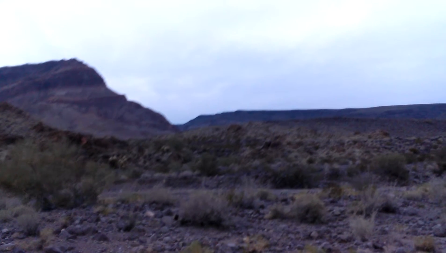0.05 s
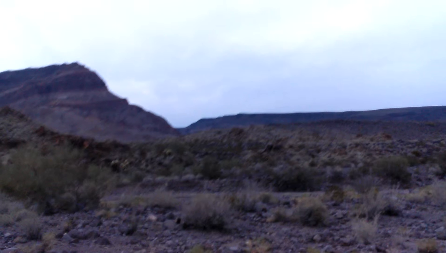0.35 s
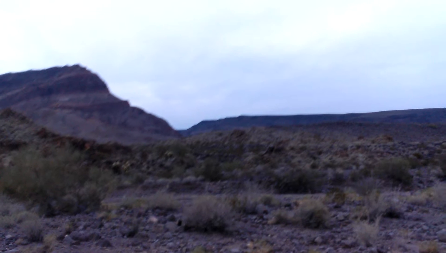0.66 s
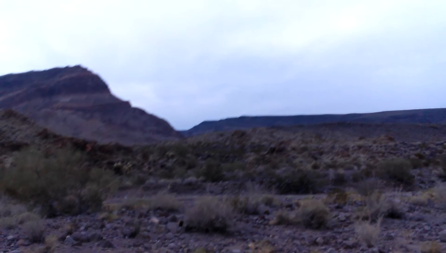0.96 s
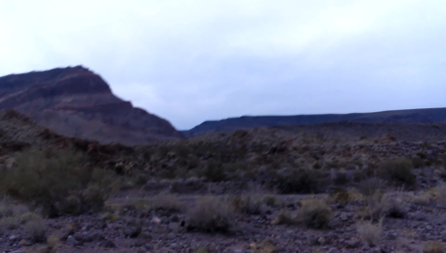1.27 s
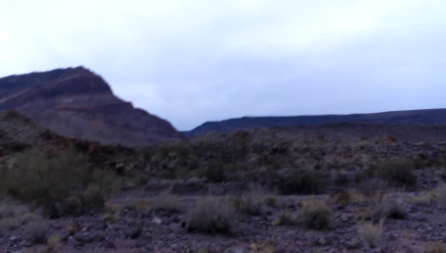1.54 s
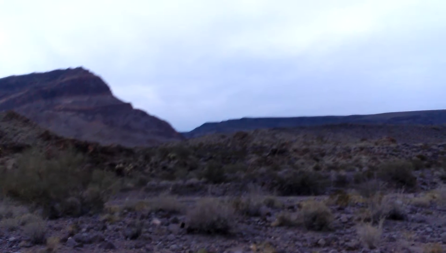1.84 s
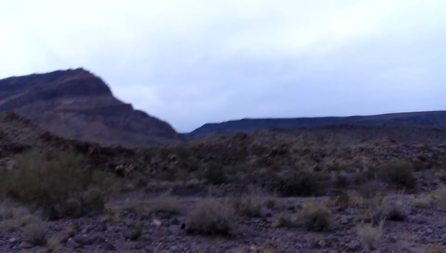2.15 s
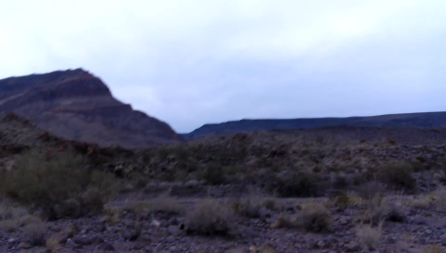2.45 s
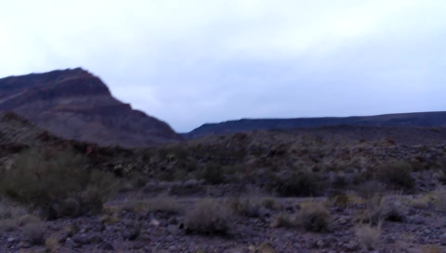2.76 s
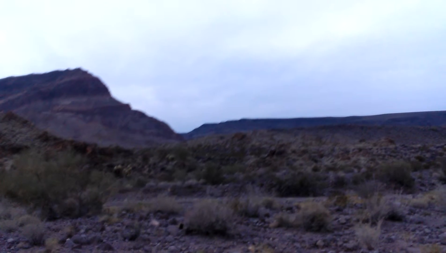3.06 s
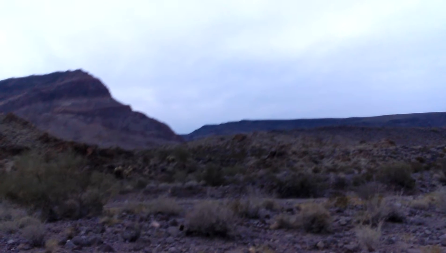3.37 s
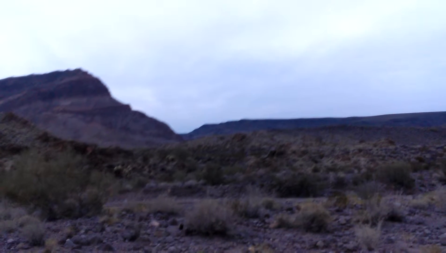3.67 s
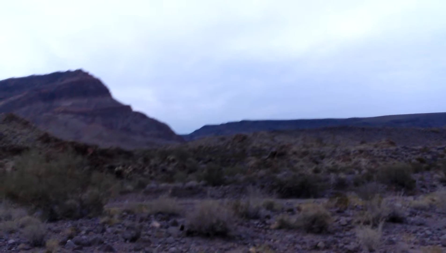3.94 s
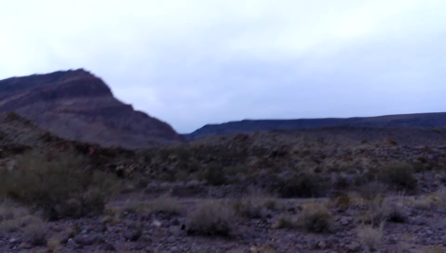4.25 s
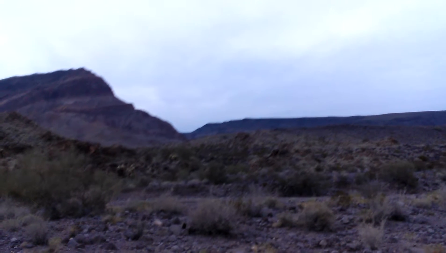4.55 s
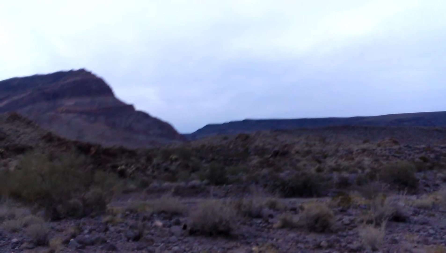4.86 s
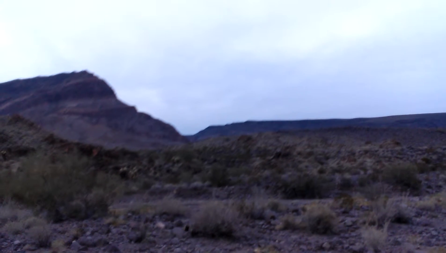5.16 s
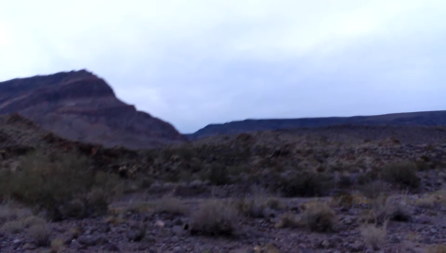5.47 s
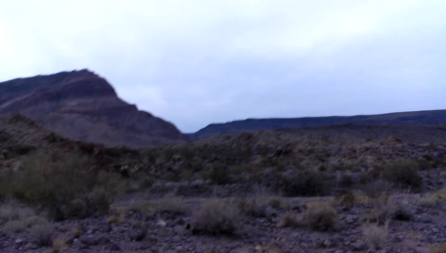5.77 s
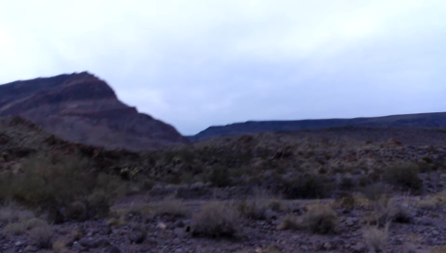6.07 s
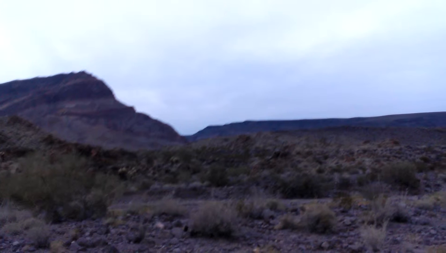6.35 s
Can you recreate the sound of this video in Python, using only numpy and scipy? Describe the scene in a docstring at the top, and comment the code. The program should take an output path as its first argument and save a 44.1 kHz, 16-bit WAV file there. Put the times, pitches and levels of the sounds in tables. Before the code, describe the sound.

A coyote opens with a high howl that cracks and drops away, followed by one short arched yelp. Light wind rumbles and puffs on the microphone. Then other coyotes answer faintly from far off, and more yelps come, ending in a quick run, each with a short echo from a slope. A soft hiss swells and sinks with the gusts and calls in the open desert.

```python
"""A coyote opens with a high howl that cracks and drops, over light wind that rumbles on the microphone.
Brush scatters the call and the slopes return a faint long tail. An arched yelp follows, then wind puffs.
From about 2.5 s others answer from far off, and more yelps come, each with a short echo from a slope.
Throughout, a noise suppressor turns quiet moments down, so the hiss swells and sinks with gusts and calls.
"""
import sys
import numpy as np
from scipy import signal
from scipy.fft import rfft, irfft, next_fast_len
from scipy.io import wavfile

SR = 44100
rng = np.random.default_rng(int(sys.argv[2]) if len(sys.argv) > 2 else 0)


def to_wav(s):
    """Save 16-bit WAV."""
    ch = np.atleast_2d(s).T  # columns
    pcm = np.round(np.clip(ch, -1, 1) * 32767)  # PCM
    wavfile.write(sys.argv[1], SR, pcm.astype(np.int16))


N = 291501
TIME = np.arange(N) / SR
FALL_S = .031  # the closing fall of a howl or yelp

# Spectrum of the hiss. Each row: frequency in Hz, relative density in dB.
HISS_SPECTRUM = [(200, -0.5), (480, 11.5), (700, 15.5), (1000, 8.5), (1500, 4), (2000, 3.5), (3000, .5),
                 (4500, -3.5), (6500, -4.5), (8300, -4), (12500, -7), (15500, -11)]


def from_db(db):
    """Amplitude grows tenfold with every 20 dB."""
    return 10 ** (np.asarray(db) / 20)


def rms_one(x):
    """Division by the root mean square gives unit power."""
    return x / np.sqrt(np.mean(x ** 2) + 1e-20)


def in_time(rows):
    """Linear interpolation gives each column of a curve at every sample."""
    seconds, *columns = np.transpose(rows)
    return [np.interp(TIME, seconds, column) for column in columns]


def drift(rate, size=N):
    """Low-passed noise wanders with unit spread, about rate times a second."""
    pole = np.exp(-80 * np.pi * rate / SR)
    slow = signal.lfilter([1], [1, -2 * pole, pole * pole], rng.standard_normal(size // 40 + 2002))
    slow = rms_one(slow[2000:])
    return np.interp(np.arange(size) / 40, np.arange(len(slow)), slow)


def coloured_noise(spectrum):
    """Spectral weighting colours white noise; the result has unit power."""
    hz, db = np.transpose(spectrum)
    size = next_fast_len(N)
    bins_hz = np.fft.rfftfreq(size, 1 / SR) + 1
    gain = from_db(np.interp(np.log(bins_hz), np.log(hz), db))
    return rms_one(irfft(rfft(rng.standard_normal(size)) * gain, size)[:N])


def voice_phase(pitch_hz, jitter):
    """The phase of the vocal folds is the integral of their trembling frequency."""
    return 2 * np.pi * np.cumsum(pitch_hz * (1 + jitter * drift(83, size=len(pitch_hz)))) / SR


def partial(phase, level_db):
    """A partial is a sinusoid, peaking 3 dB above its rms level."""
    return np.sqrt(2) * from_db(level_db) * np.sin(phase)


def throat_db(hz):
    """Resonance in the throat lifts or weakens a partial according to its frequency."""
    # Each row: frequency in Hz, gain in dB.
    throat_response = [(550, -1.5), (700, -2), (780, 1.5), (850, 3), (1020, -0.5), (1250, 4.5), (1420, -2),
                       (1600, 4.5), (1780, -2.5), (1950, -11), (2150, 0), (2350, -25.5), (2600, -17)]
    return np.interp(hz, *np.transpose(throat_response))


def collapse(age_s, drop_share=.55, drop_s=.021):
    """As the voice lets go, the remaining share of its pitch relaxes exponentially."""
    return 1 - drop_share * (1 - np.exp(-np.maximum(age_s, 0) / drop_s))


def ramp(age_s, length_s):
    """A linear envelope runs from 0 to 1, centred on age zero."""
    return np.clip(.5 + age_s / length_s, 0, 1)


def howl(octave_db=-64, flutter_db=0.75, release_s=0.011, break_s=.006):
    """Falsetto is nearly sinusoidal: it sags, cracks and recovers; only its octave sounds in the fall."""
    # Each row: time in seconds, pitch in Hz, level in dB before the throat.
    contour = [(0, 1012, -48.5), (.25, 1005, -49), (.305, 986.6, -55.5), (.335, 992.4, -47.5),
               (.41, 979, -51), (.438, 866, -64), (.457, 887, -58.5), (.48, 937, -48), (.52, 940.6, -47.5),
               (.56, 930, -49)]
    pitch_hz, level_db = in_time(contour)
    end = contour[-1][0]
    pitch_hz = pitch_hz * collapse(TIME - end)
    phase = voice_phase(pitch_hz, jitter=0.003)
    first = partial(phase, level_db + flutter_db * drift(25) + throat_db(pitch_hz))
    second = partial(2 * phase, octave_db + throat_db(2 * pitch_hz))
    return first * ramp(end - TIME, break_s) + second * ramp(end + FALL_S - TIME, release_s)


def wind(eddy_db=-8, lumpy_db=2.05, roundness=0.75, lean=0.5, rush_db=-26):
    """Turbulence rumbles on the microphone; each puff pushes or pulls, stirs more rumble and hisses."""
    # Each row: start in seconds, length in seconds, peak pressure in dB.
    puffs = [(1.092, 0.016, -54.0), (1.343, 0.023, -54.5), (1.429, 0.016, -46), (1.537, 0.03, -55.0),
             (1.619, 0.062, -54.5), (1.824, 0.038, -58.5), (2.027, 0.02, -55.5), (2.133, 0.034, -50),
             (2.197, 0.094, -52.5), (2.281, 0.059, -56.5), (2.333, 0.099, -56.5), (2.484, 0.017, -51.5),
             (2.546, 0.02, -53), (2.947, 0.022, -50.5), (2.996, 0.24, -62.5), (3.357, 0.045, -57),
             (3.463, 0.13, -53), (3.658, 0.035, -56.5), (3.776, 0.05, -55.5), (3.911, 0.28, -61),
             (4.139, 0.025, -51.0), (4.199, 0.029, -55.5), (4.228, 0.062, -52.5), (4.421, 0.042, -55),
             (4.566, 0.017, -53), (4.661, 0.048, -54.0), (4.869, 0.058, -55), (5.02, 0.14, -57.0),
             (5.33, 0.033, -53.5), (5.876, 0.016, -49.0), (6.066, 0.13, -55.5), (6.256, 0.019, -51.5),
             (6.28, 0.12, -57.0), (6.477, 0.046, -57), (6.57, 0.043, -53)]
    # Each row: time in seconds, level of the rumble in dB.
    breeze = [(0.0, -58), (0.55, -59), (0.7, -59), (1.25, -63.0), (1.6, -60.5), (1.8, -66), (2.08, -63.5),
              (2.25, -63.5), (2.7, -57), (3.05, -67.5), (3.35, -63), (4.05, -64), (4.3, -60), (5.15, -58),
              (5.55, -63), (6.05, -59.5), (6.22, -65), (6.6, -62.5)]
    # Each row: frequency in Hz, relative density in dB.
    rumble_spectrum = [(12, -4), (25, 0), (50, -3.5), (75, -9.5), (100, -9.5), (160, -15.5), (280, -18),
                       (450, -24), (900, -37.5), (2000, -59.5)]
    pressure = np.zeros(N)
    for (start, length_s, peak_db), sign in zip(puffs, rng.choice([-1, 1], len(puffs))):
        during = (TIME > start) & (TIME < start + length_s)
        progress = (TIME[during] - start) / length_s
        pressure[during] += sign * from_db(peak_db) * np.abs(np.sin(np.pi * progress ** lean)) ** roundness
    rumble_db, = in_time(breeze)
    stir = np.hypot(from_db(rumble_db + lumpy_db * drift(36)), from_db(eddy_db) * pressure)
    hissing_puffs = pressure * (1 + from_db(rush_db) * coloured_noise(HISS_SPECTRUM))
    return hissing_puffs + stir * coloured_noise(rumble_spectrum)


def reflections(x, delay_s, t60_s):
    """Scattering off rocks and brush gives a dense response that decays exponentially."""
    t = TIME[:2 * SR]
    response = rng.standard_normal(len(t)) * from_db(-60 * t / t60_s) * (t > delay_s)
    return signal.fftconvolve(x, response / np.sqrt(np.sum(response ** 2)))[:N]


def valley(x, t60_s=6.9, dull_hz=1100, waver_s=0.00021):
    """Reverberation is dulled by distance, and its travel time wavers in the moving air."""
    tail = reflections(x, delay_s=0.088, t60_s=t60_s)
    dulled = signal.sosfilt(signal.butter(2, dull_hz, fs=SR, output="sos"), tail)
    return np.interp(TIME + waver_s * drift(14), TIME, dulled)


def yelp(t, row, scoop_hz_per_s=7500, arch=0.342, ease=0.67,
         attack_s=0.02, break_s=0.0046, release_s=0.012, accent_db=4, accent_s=0.0098,
         fall_loss_db=5, third_sag_db=6, slack_db=1.5, upper_growth=0.32):
    """Three harmonics share one glide: the pitch scoops up, climbs to a crest and collapses."""
    start, crest, start_hz, crest_hz, first_db, growth_db, octave_db, third_db, scoop_s, rasp = row
    climb = np.clip((t - start) / (crest - start), 0, 1)
    rising_hz = start_hz + (crest_hz - start_hz) * climb * (1 + arch * (1 - climb))
    pitch_hz = (rising_hz - scoop_hz_per_s * np.maximum(start - t, 0)) * collapse(t - crest)
    phase = voice_phase(pitch_hz, jitter=0.0056)
    # the fundamental stops at the crest
    lower = ramp(t - start, attack_s) * ramp(crest + break_s / 2 - t, break_s)
    # the upper partials slacken on the climb, flare at the crest and ride the fall
    upper = ramp(t - start + scoop_s, attack_s + ease * scoop_s) * ramp(crest + FALL_S - t, release_s)
    effort_db = accent_db * np.exp(-np.abs(t - crest) / accent_s) - slack_db * np.sin(np.pi * climb)
    loss_db = fall_loss_db * np.maximum(t - crest, 0) / FALL_S
    upper = upper * from_db(effort_db + upper_growth * growth_db * (climb - .5) - loss_db)
    first = lower * partial(phase, first_db + growth_db * (climb - .5) + throat_db(pitch_hz))
    second = upper * partial(2 * phase, octave_db + throat_db(2 * pitch_hz))
    third = upper * partial(3 * phase, third_db - third_sag_db * (climb - .5) + throat_db(3 * pitch_hz))
    # uneven fold vibration smears the upper partials into a rasp
    grit = second * drift(170, size=len(t)) + 1.44 * third * drift(120, size=len(t))
    shimmer = 1 + .5 * rasp * drift(110, size=len(t))
    return (first + second + third) * shimmer + rasp * grit


def yelps(echo_fade_db=12):
    """Each yelp takes two paths: one straight to the listener, one to the nearest slope."""
    # Each row: start and crest in seconds, pitch at each in Hz, fundamental, its growth over the climb,
    # octave and third partial in dB before the throat, scoop in seconds, rasp from 0 to 1, echo in dB.
    calls = [(0.724, 0.818, 672, 748.5, -59.5, 2.5, -62.5, -72.5, 0.026, 0.52, -29),
             (2.749, 2.83, 581, 808.4, -56, -7, -61, -62, .007, 0.33, -5),
             (3.19, 3.26, 573.6, 794, -58, -7.5, -60.5, -64.5, 0.0064, 0.36, -8),
             (5.121, 5.214, 554, 820, -58, -3.5, -58.5, -62.5, 0.001, 0.35, -5.5),
             (5.372, 5.443, 634, 856, -58, 12.5, -56.5, -64, 0.016, 0.27, -5.5),
             (5.619, 5.687, 647, 851.5, -55.5, 7.5, -56, -61, .014, 0.32, -5.5),
             (5.95, 6.017, 556, 718, -58.5, -12, -56, -72.5, .003, 0.28, -7.5),
             (6.298, 6.354, 538, 689, -60, -5, -58, -67.5, 0.0049, 0.12, -8),
             (6.598, 6.685, 556, 670, -63.5, -5, -59, -65.5, 0.0062, .3, -14)]
    direct, to_slope = np.zeros((2, N))
    for *row, echo_db in calls:
        start, crest = row[:2]
        during = (TIME > start - .06) & (TIME < crest + .07)
        call = yelp(TIME[during], row)
        direct[during] += call
        # mostly the start and the fall of a yelp are heard again
        dip_db = np.interp(TIME[during], [start, crest, crest + FALL_S / 2], [0, -echo_fade_db, 0])
        to_slope[during] += call * from_db(echo_db + dip_db)
    return direct, to_slope


def slope_echo(x, delay_s=.034, low_hz=900):
    """A single reflection from the nearest slope arrives late and thin."""
    thin = signal.sosfilt(signal.butter(2, low_hz, "high", fs=SR, output="sos"), x)
    return np.interp(TIME - delay_s, TIME, thin, left=0)


def far_calls():
    """Attenuation over distance leaves only the fundamental of each answer, which swells and fades."""
    # Each row: start and end in seconds, pitch at each in Hz, level in dB, jitter as a share of pitch.
    answers = [(2.543, 2.768, 585, 632, -70.5, 0.032), (2.862, 3.181, 1264, 1420, -77, 0.011),
               (2.993, 3.785, 751, 800, -85, .027), (3.328, 3.714, 1375, 1330, -69.5, 0.011),
               (4.197, 5.105, 694, 755, -84, 0.038)]
    out = np.zeros(N)
    for start, end, start_hz, end_hz, level_db, jitter in answers:
        during = (TIME > start) & (TIME < end)
        progress = (TIME[during] - start) / (end - start)
        phase = voice_phase(start_hz + (end_hz - start_hz) * progress, jitter)
        out[during] += partial(phase, level_db) * np.sqrt(np.sin(np.pi * progress))
    return out


def scene(hiss_db=-71.5, brush_db=-14, valley_db=-19):
    """Calls, their returns from the land, wind and a steady hiss add by superposition."""
    yelping, to_slope = yelps()
    calls = howl() + yelping
    brush = from_db(brush_db) * reflections(calls, delay_s=0.03, t60_s=0.52)
    returns = slope_echo(to_slope) + brush + from_db(valley_db) * valley(calls)
    mix = calls + returns + far_calls() + wind() + from_db(hiss_db) * coloured_noise(HISS_SPECTRUM)
    return mix[None]


def suppressor(x, unity_db=-59, follow_s=0.016):
    """In an expander the gain follows the envelope, so quiet moments sink and loud ones rise."""
    pole = np.exp(-1 / (follow_s * SR))
    at_start = np.abs(x[:, :SR // 50]).mean(axis=1, keepdims=True)
    envelope, _ = signal.lfilter([1 - pole], [1, -pole], np.abs(x), zi=at_start)
    return x * (envelope / from_db(unity_db))


def record(dry, cutoff_hz=15750):
    """Expansion widens the dynamic range, then a steep low-pass limits the bandwidth."""
    return signal.sosfilt(signal.ellip(12, .1, 70, cutoff_hz, fs=SR, output="sos"), suppressor(dry))


dry = scene()
out = record(dry)
to_wav(out)
```